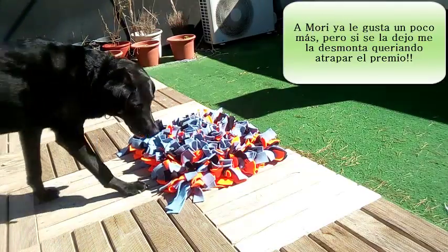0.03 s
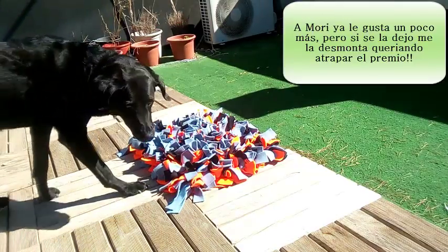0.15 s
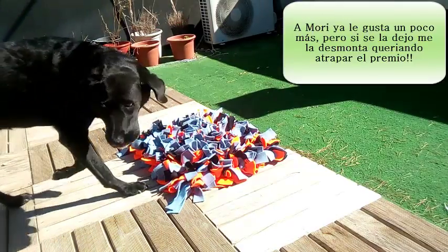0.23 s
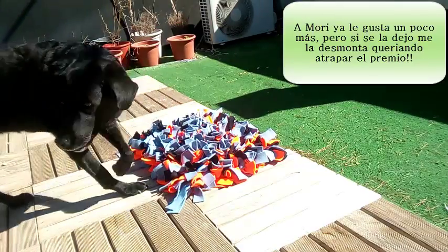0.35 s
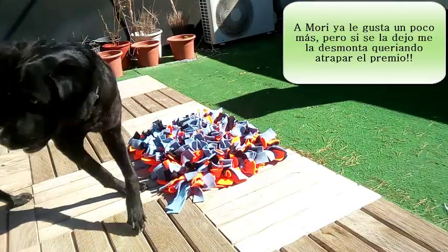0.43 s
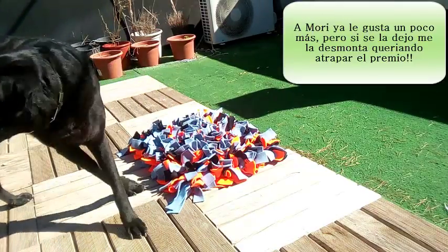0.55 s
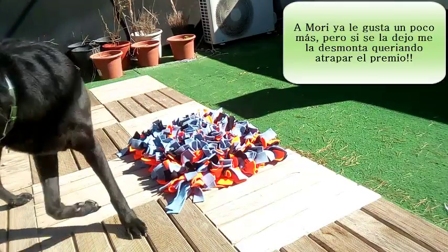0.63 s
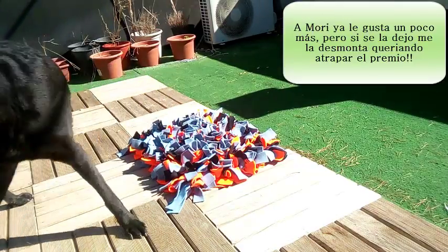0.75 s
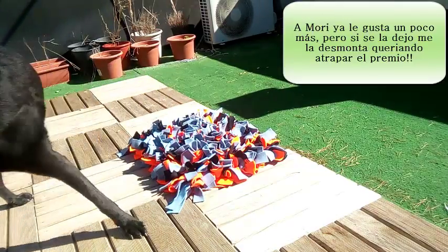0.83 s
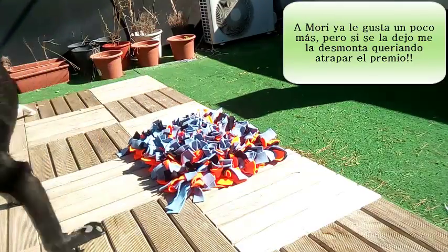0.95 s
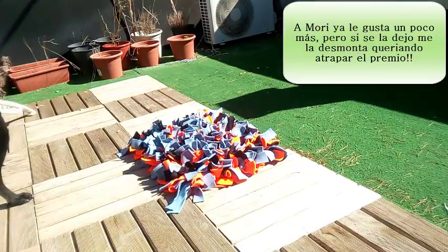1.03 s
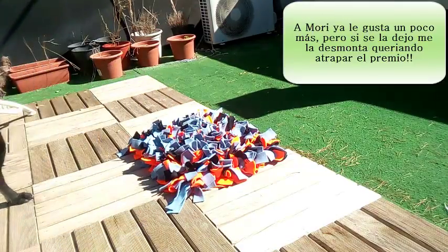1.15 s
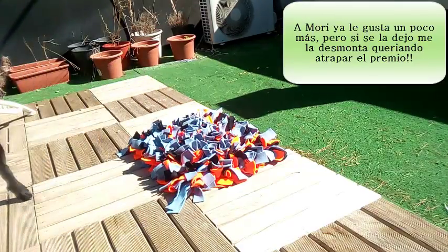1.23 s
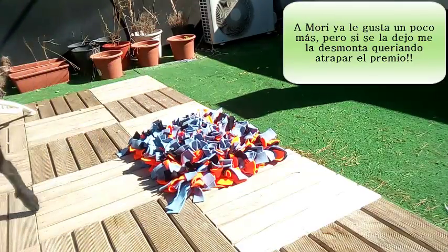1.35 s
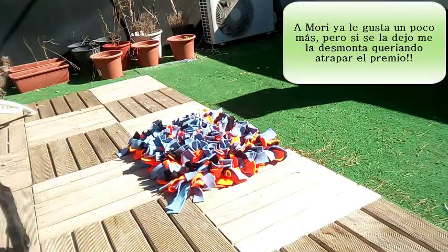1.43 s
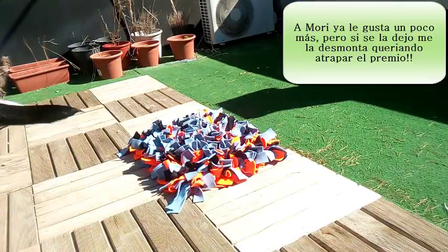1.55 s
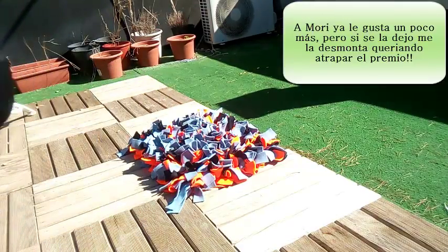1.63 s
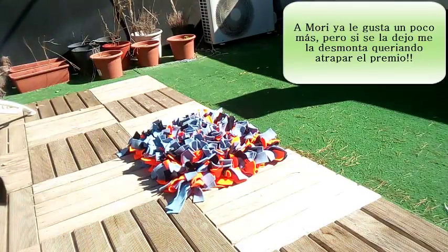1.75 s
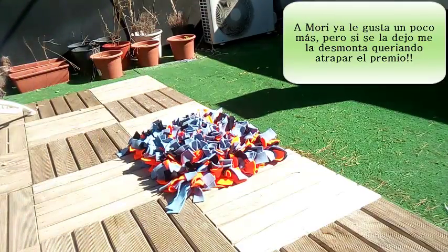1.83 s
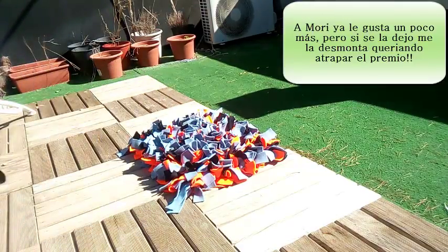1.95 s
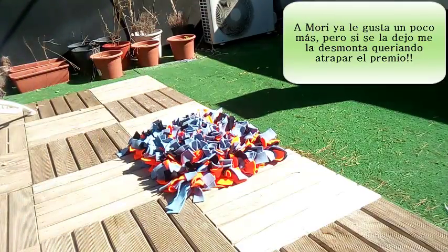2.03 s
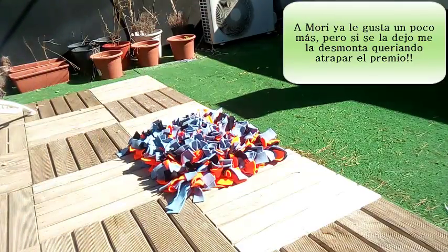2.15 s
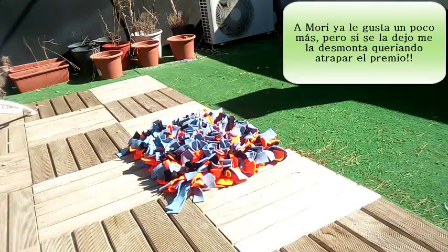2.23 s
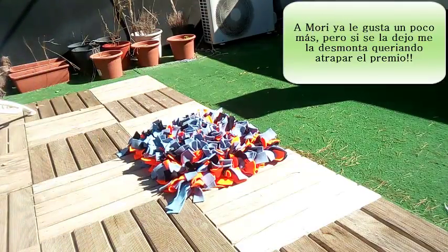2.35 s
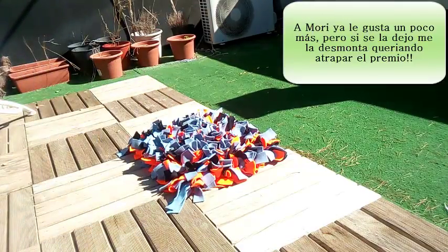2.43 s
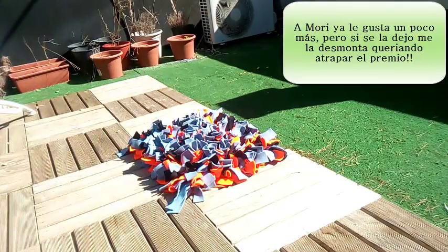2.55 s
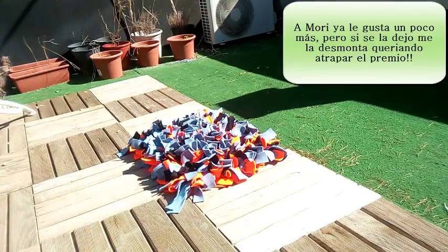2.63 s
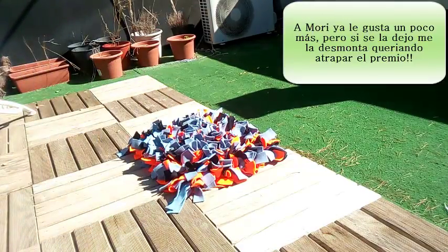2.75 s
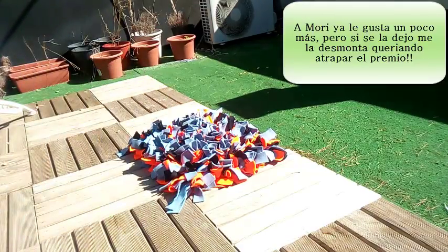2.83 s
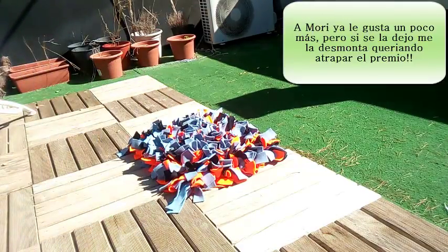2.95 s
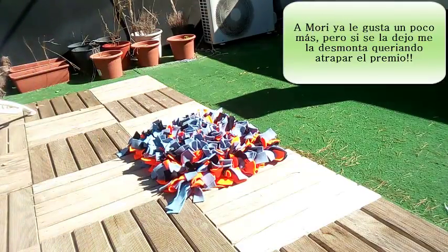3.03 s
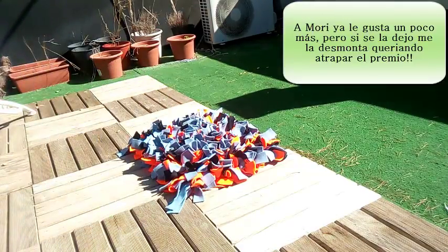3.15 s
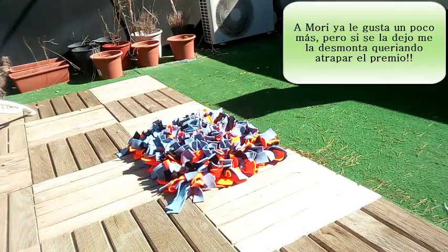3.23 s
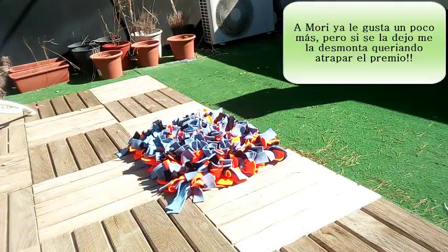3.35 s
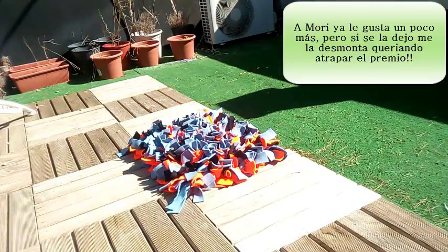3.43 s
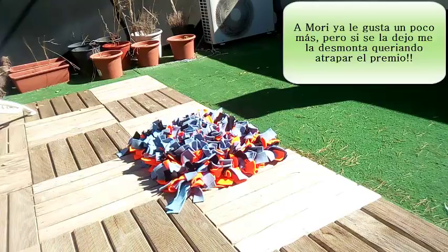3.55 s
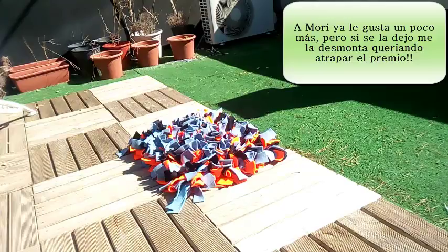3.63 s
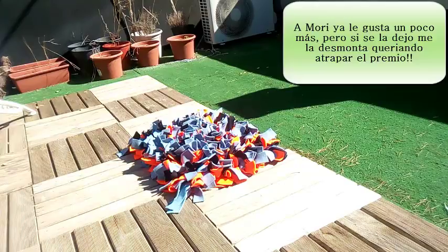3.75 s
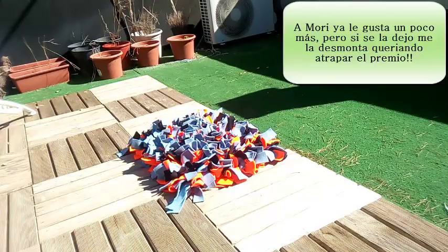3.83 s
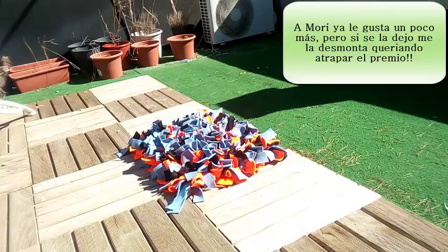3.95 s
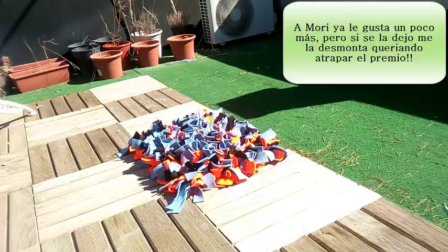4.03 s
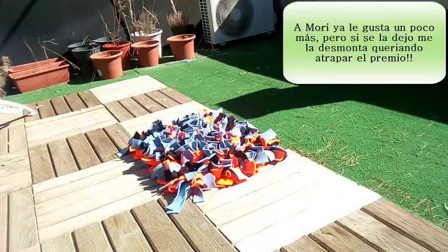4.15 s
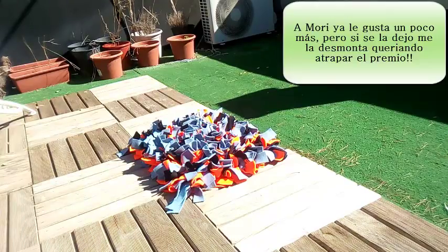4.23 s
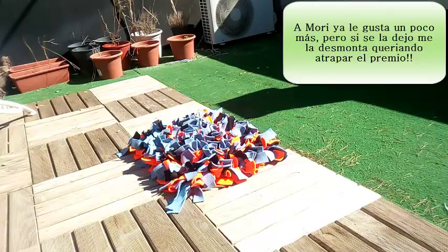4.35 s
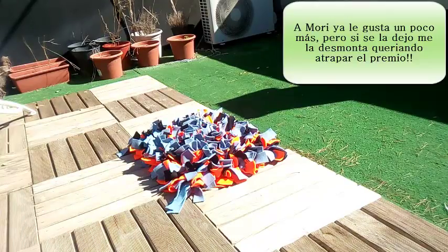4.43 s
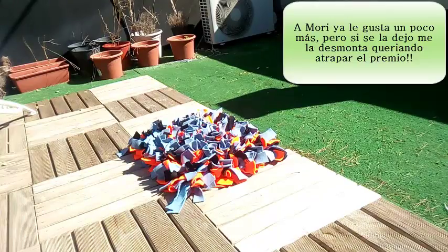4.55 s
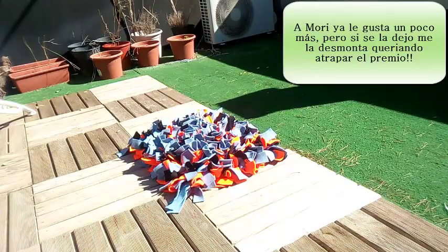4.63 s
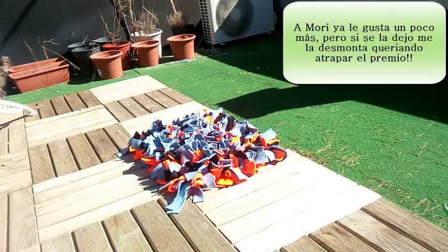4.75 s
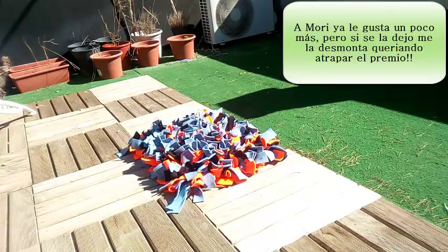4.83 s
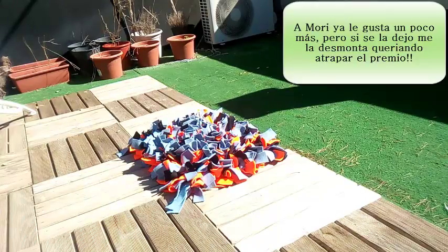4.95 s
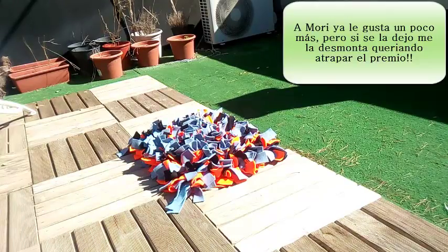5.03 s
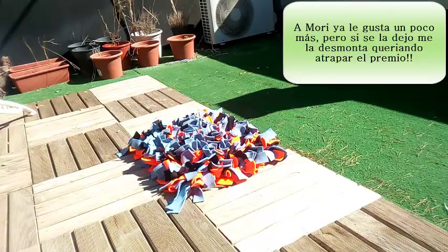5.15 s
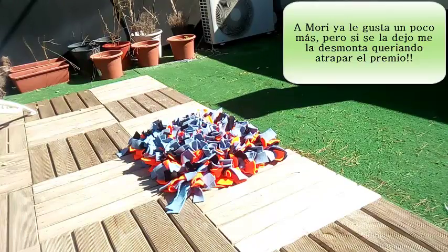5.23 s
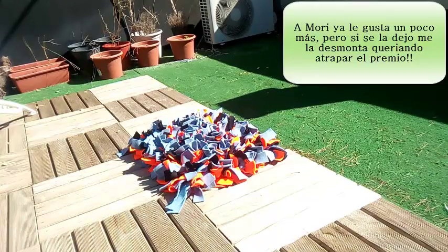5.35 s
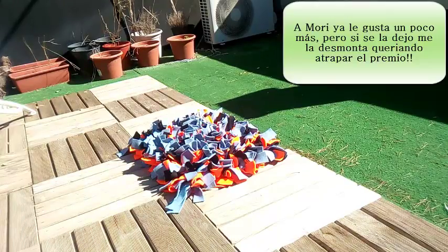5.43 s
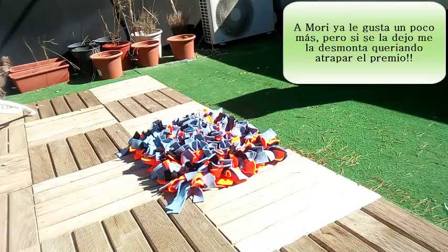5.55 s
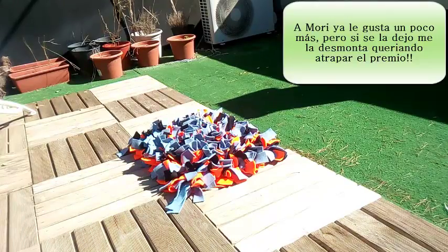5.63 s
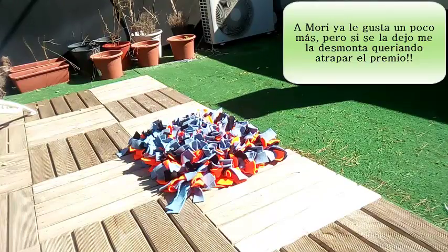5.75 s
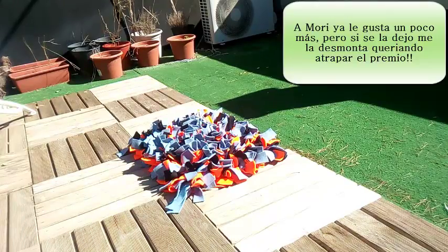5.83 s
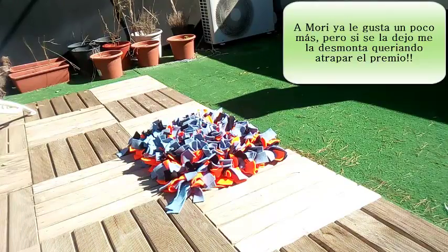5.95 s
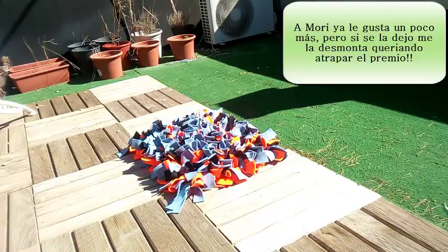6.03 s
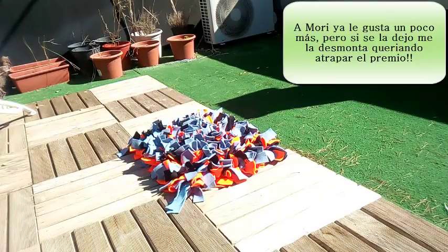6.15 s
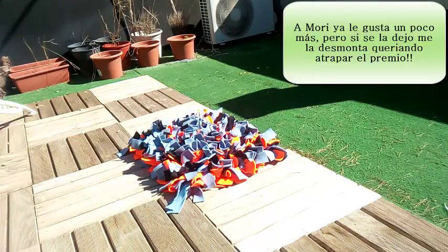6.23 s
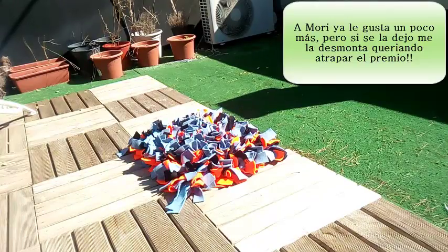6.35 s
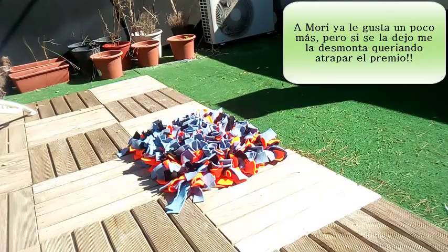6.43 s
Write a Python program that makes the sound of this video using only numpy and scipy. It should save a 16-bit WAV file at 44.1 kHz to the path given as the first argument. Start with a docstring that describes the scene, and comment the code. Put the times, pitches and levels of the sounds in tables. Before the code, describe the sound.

A dog's claws snap and tap irregularly on wooden decking, with gritty crunches, soft scuffs and low thuds over a faint outdoor hush.

```python
"""Dog on a walled terrace

A dog moves about a small walled terrace with wooden deck tiles: its claws tap and it crunches a hard treat.
Each tap or bite is a snap with grit around it, filtered by what was hit; near walls and the yard answer.
Paws scuff and squeak softly in between: uneven noise through a slowly rising resonance.
Low thuds, sines of sagging pitch, and gusts of rumbling noise reach the microphone over a faint outdoor hush."""
import sys
import numpy as np
from scipy import signal
from scipy.fft import rfft, irfft, next_fast_len
from scipy.io import wavfile
from scipy.ndimage import map_coordinates

SR = 44100
rng = np.random.default_rng(int(sys.argv[2]) if len(sys.argv) > 2 else 0)


def dump(signal):
    """Clip the signal to [-1, 1] and save it as 16-bit WAV at the path in sys.argv[1]."""
    limited = np.clip(np.atleast_2d(signal).T, -1, 1)
    pcm = np.round(limited * 32767).astype(np.int16)
    wavfile.write(sys.argv[1], SR, pcm)


N = 286209
TOP_HZ = 11050  # upper band limit

# shared spectrum of the taps and bites, also of the grit in scuffs: frequency_hz, relative_level_db
CONTACT_COLOUR = [(60, -23), (300, -17), (700, -10.5), (1400, -1.5), (2800, -1.5), (4800, -7.5),
                  (6000, -8.5), (7200, -18.5), (11000, -27)]


def amp(db):
    """Amplitude factor of a level in dB."""
    return 10 ** (np.asarray(db) / 20)


def unit(x):
    """x scaled to rms 1."""
    return x / np.sqrt(np.mean(x ** 2) + 1e-20)


def along(points, hz):
    """(Hz, value) points joined by straight lines on a log frequency axis."""
    point_hz, values = np.transpose(points)
    return np.interp(np.log(hz + 1), np.log(point_hz), values)


def curve(rows):
    """(s, value) rows as one value per sample."""
    return np.interp(np.arange(N) / SR, *np.transpose(rows))


def add(track, s, sound):
    """Mix a sound into a track from time s on, cutting what falls outside."""
    start = round(s * SR)
    sound = sound[max(-start, 0):]
    part = track[max(start, 0):][:len(sound)]
    part += sound[:len(part)]


def wobble(rate, size):
    """A smooth random curve, rate knots a second."""
    knots = rng.standard_normal(int(size * rate / SR) + 4)
    return map_coordinates(knots, [np.arange(size) * rate / SR])


def filtered(x, gain):
    """x times a gain that depends on frequency."""
    size = next_fast_len(len(x) + 8192)
    spectrum = rfft(x, size) * gain(np.fft.rfftfreq(size, 1 / SR))
    return irfft(spectrum, size)[:len(x)]


def noise(colour):
    """Noise of rms 1 with the given spectrum."""
    return unit(filtered(rng.standard_normal(N), lambda hz: amp(along(colour, hz))))


def causal(db):
    """The impulse response that starts at once and has these levels on the FFT grid."""
    cepstrum = irfft(db * np.log(10) / 20)
    half = len(cepstrum) // 2
    # folding the cepstrum onto positive time gives minimum phase
    cepstrum[1:half] *= 2
    cepstrum[half + 1:] = 0
    return irfft(np.exp(rfft(cepstrum)))


def gust_strength():
    """Each gust rises, holds and falls away exponentially; the strongest flow of the moment counts."""
    # gusts on the microphone: start_s, hold_length_s, level_db
    gusts = [(0.36, 0.12, -45), (4.42, 0.14, -42), (4.715, 0.13, -48), (4.859, .25, -45),
             (5.109, 0.098, -52.5), (5.815, 0.12, -48), (5.911, 0.048, -40.5)]
    attack_s, release_s, draught_db = 0.012, 0.015, -73.5  # a faint draught flows between gusts
    t = np.arange(N) / SR
    strength = np.full(N, amp(draught_db))
    for s, length, db in gusts:
        before = np.maximum(s - t, 0) / attack_s
        after = np.maximum(t - s - length, 0) / release_s
        strength = np.maximum(strength, amp(db) * np.exp(-before - after))
    return strength


def air(flutter_db):
    """The faint hush of the terrace, and gusts that rumble on the microphone, both as coloured noise."""
    # spectrum of the outdoor background: frequency_hz, relative_level_db
    hush_colour = [(25, -19.5), (50, -11.5), (85, 1), (250, -3), (500, -4.5), (1000, -10), (2200, -9.5),
                   (3200, -15), (5000, -17.5), (8000, -23.5), (11000, -25.5)]
    # course of the background before flutter: time_s, level_db
    hush_course = [(0, -62.5), (1.5, -63.5), (2.5, -64.5), (3.4, -62), (5.1, -62.5), (5.55, -69.5),
                   (6.0, -62.5), (6.49, -65)]
    # spectrum of air flow at the microphone: frequency_hz, relative_level_db
    rumble_colour = [(20, 2.5), (50, -1.5), (80, 7.5), (140, -2.5), (200, -13.5), (400, -33), (1000, -53),
                     (3000, -110)]
    hush_level = amp(curve(hush_course) + flutter_db * wobble(7.5, N))
    hush = hush_level * noise(hush_colour)
    return hush + gust_strength() * noise(rumble_colour)


def yard(wet_db, build_s, fade_s=0.72, size=16384):
    """Response of the place: direct path, near walls, and a diffuse wash that dies away in about a quarter second."""
    # decay of the wash: frequency_hz, t60_s
    decay = [(150, 1), (450, 0.24), (900, .32), (2000, 0.22), (5500, .25), (10000, 0.21)]
    # near wall echoes against the direct path: nominal_delay_s, level_db
    walls = [(.0092, -24), (0.0161, -5.5), (0.031, -19)]
    hz, t, z = signal.stft(rng.standard_normal(size), SR, nperseg=256)
    fading = z * amp(-60 * t / along(decay, hz)[:, None])
    wash = signal.istft(fading, SR, nperseg=256)[1][:size]
    age = np.arange(size) / SR
    wash *= (1 - np.exp(-(age / build_s) ** 2)) * np.exp(-(age / fade_s) ** 3)
    response = amp(wet_db) * wash / np.linalg.norm(wash)
    response[0] += 1  # direct path
    for delay, db in walls:
        varied_delay = delay * (1 + .02 * rng.standard_normal())
        response[round(varied_delay * SR)] += amp(db)
    return response


def scuffs(rough_db, grit_db, wet_db, overtone_db, glide):
    """Uneven friction swells and fades in one slowly rising resonance, with an overtone and broad grit."""
    # soft paw scuffs: middle_s, length_s, level_db, centre_hz, width_hz
    rubs = [(0.0, 0.038, -53, 1340, 1130), (0.149, 0.041, -53, 320, 122), (0.207, 0.041, -56, 1330, 140),
            (0.549, 0.056, -55, 2400, 513), (0.601, 0.037, -33, 790, 132), (0.729, 0.086, -45.5, 803, 168),
            (0.798, 0.15, -46.5, 1420, 240), (0.983, 0.044, -42, 770, 283), (1.336, 0.019, -54, 970, 604),
            (1.882, 0.01, -38, 2106, 176), (1.644, 0.063, -52.5, 4000, 4170),
            (1.658, 0.081, -54.5, 1490, 600), (2.152, 0.023, -46.5, 700, 194.7),
            (3.425, 0.02, -56, 2400, 700), (3.899, 0.023, -43.5, 960, 79), (4.23, 0.075, -56.5, 1320, 500),
            (4.508, 0.014, -40, 2500, 597), (4.967, 0.2, -58.5, 1510, 500), (5.086, 0.038, -51, 4570, 3390),
            (6.171, 0.068, -50, 1590, 895), (6.277, 0.092, -59, 3250, 496)]
    # a run of thin squeaks: middle_s, length_s, level_db
    squeaks = [(3.968, 0.4, -59.5), (4.325, 0.055, -50.5), (4.461, 0.078, -47.5), (4.616, 0.061, -58),
               (4.766, 0.041, -56.5)]
    squeak_hz, squeak_width_hz = 4550, 500  # the resonance they share
    track, t = np.zeros(N), np.arange(SR // 2) / SR
    middle = t[-1] / 2
    warped_t = t + glide / 2 * (t - middle) ** 2  # playback speeds up by the share glide per second
    for s, length, db, centre_hz, width_hz in rubs + [(*row, squeak_hz, squeak_width_hz) for row in squeaks]:
        def peak(hz):
            return 1 / (1 + (2 * (hz - centre_hz) / width_hz) ** 2)

        def resonance(hz):
            overtone = amp(overtone_db) * peak(hz / 1.88)
            return peak(hz) + overtone + amp(grit_db + along(CONTACT_COLOUR, hz))

        swell = np.exp(-2 * ((t - middle) / length) ** 2)
        friction = swell * rng.standard_normal(len(t)) * amp(rough_db * wobble(120, len(t)))
        rising = map_coordinates(filtered(friction, resonance), [SR * warped_t])
        rub = signal.fftconvolve(rising, yard(wet_db, build_s=0.0057))
        rub *= np.linalg.norm(swell) / np.linalg.norm(rub)  # same energy as noise of rms 1 under the swell
        add(track, s - middle, amp(db) * rub)
    return track


def crack_train():
    """Every crack as one row; a lesser crack borrows the colour of the nearest tap or bite."""
    # taps and bites, each at its main crack:
    # time_s, level_db, body_db, edge_db, ring_hz, ring_db, hollow_db, yard_db
    main_cracks = [(0.2613, -12, 3.5, -2.5, 2190, 3, 10.5, -6.5),
                   (0.5831, -23, -5.5, -3.5, 1170, 5.5, 2, -3.5), (0.909, -21, 10.5, 3.5, 3780, 6, 7, -6.5),
                   (1.1161, -35.5, -7.5, 2, 1750, -0.5, 10, 2), (1.405, -44, 5, 4, 2414, 15.5, -23, -3.5),
                   (1.881, -51.5, 22.5, -0.5, 2080, 9, -31, 0.5), (2.041, -50.5, 6.5, -10, 1550, 4.5, 9, 1),
                   (2.1431, -44.5, 17, -13, 682, 12, -12, -4), (2.2343, -47, -8, 9.5, 2090, 4, -2, -5),
                   (2.649, -43.5, -2, 0.5, 1753, 15, 25.5, 1), (2.794, -53.5, 9, 8.5, 3500, 6, -6, -14),
                   (2.9975, -20.5, -6, -1.5, 1630, 4.5, 13, -5.5),
                   (3.296, -31, -14.5, 9.5, 5730, 2.5, 14, -8.5),
                   (3.5826, -25, -8, 7, 2630, 4.5, -2.5, -4.5), (3.6742, -28, 3.5, 9.5, 2030, 12, -47, -7),
                   (3.867, -34, -7, 13.5, 2340, 14.5, 15, -3.5),
                   (4.0893, -24, 0.5, 1.5, 1657, 9, 11.5, -3.5),
                   (4.494, -33, -8.5, -2.5, 1754, 17.5, 0, -7), (5.06, -34.5, 2, -3, 1740, 25, -4, -1.5),
                   (6.1164, -34.5, 1.5, 2, 2240, 9.5, 2, 3.5)]
    # lesser cracks: time_s, level_db, extra_edge_db
    lesser_cracks = [(0.6709, -36.5, 1), (0.683, -44, 0), (0.8994, -29, -6), (0.9413, -34, -13),
                     (1.185, -46, -2), (1.243, -43.5, -2.5), (1.393, -50, -3), (1.862, -53, -10),
                     (2.427, -57, -13.5), (2.988, -33.5, 19.5), (3.0237, -31, 8), (3.0843, -33, 7),
                     (3.2675, -47, -10.5), (3.611, -25.5, -6.5), (3.6261, -26.5, -5.5), (3.6593, -26, -6.5),
                     (3.724, -31, -4), (3.751, -40, -3), (3.794, -45.5, -2), (4.035, -34, 0.5),
                     (4.0487, -28, 4), (4.1008, -27.5, 12), (4.1422, -34, 8), (4.159, -29, 0),
                     (4.277, -47, 4), (4.89, -51, 7), (5.0047, -47, 1.5), (6.2131, -46, 1),
                     (6.272, -49.5, 1)]
    ring_share, hollow_share = 1, 0.25  # shares of the main crack's ring dB and cavity dB
    extra_yard_db = 2  # lesser cracks are heard a little more by way of the yard
    train = list(main_cracks)
    for s, db, extra_edge_db in lesser_cracks:
        nearest = min(main_cracks, key=lambda crack: abs(crack[0] - s))
        _, _, body_db, edge_db, ring_hz, ring_db, hollow_db, wet_db = nearest
        train.append((s, db, body_db, edge_db + extra_edge_db, ring_hz,
                      ring_share * ring_db, hollow_share * hollow_db, wet_db + extra_yard_db))
    return train


def firmness(db):
    """Snap dB and crumble time of a contact of this level: the louder it is, the sooner it stops crumbling."""
    # snap and after-cracks by loudness: contact_level_db, snap_db, crumble_s
    contacts = [(-48.5, -1, 0.0086), (-34, -11.5, 0.0055), (-24.5, -1.5, 0.0032), (-11, -1, 0.0027)]
    levels, *columns = np.transpose(contacts)
    return [np.interp(db, levels, column) for column in columns]


def bell(hz, centre_hz, width):
    """A resonance peak of height 1; width is a share of its centre."""
    return 1 / (1 + (np.log((hz + 1) / centre_hz) / width) ** 2)


def snap(snap_db, lead_s, lead_db, crumble_db, crumble_s, size=2048):
    """Force of one contact: a softened onset leads into the snap in the middle, tiny after-cracks follow."""
    t = (np.arange(size) - size // 2) / SR
    grit = rng.standard_normal(size) ** 3  # cubing makes it sparse and spiky
    lead = grit * (t < 0) * np.exp(-np.abs(t) / lead_s)
    crumble = grit * (t > 0) * np.exp(-np.abs(t) / crumble_s)
    force = amp(snap_db) * (t == 0)
    force = force + amp(lead_db) * lead / np.linalg.norm(lead)
    return force + amp(crumble_db) * crumble / np.linalg.norm(crumble)


def clicks(ring_width, hollow_width, lift_hz, ripple_db, spacing_hz, size=2048):
    """Each snap sounds through what was hit; the dog keeps moving, so each finds its own paths round the yard."""
    # where body acts in the spectrum: frequency_hz, share_of_body_db
    body_shape = [(300, .55), (650, 1), (1000, 1), (1800, 0)]
    # where edge acts in the spectrum: frequency_hz, share_of_edge_db
    edge_shape = [(2500, 0), (5000, 1)]
    hollow_hz = 495  # lowest pitch of the cavity note
    track, hz = np.zeros(N), np.fft.rfftfreq(size, 1 / SR)
    for s, db, body_db, edge_db, ring_hz, ring_db, hollow_db, wet_db in crack_train():
        colour = along(CONTACT_COLOUR, hz)
        colour += body_db * along(body_shape, hz) + edge_db * along(edge_shape, hz)
        cavity_hz = hollow_hz + lift_hz * max(body_db, 0)  # a more open cavity sounds fuller and higher
        colour += ring_db * bell(hz, ring_hz, ring_width)
        colour += hollow_db * bell(hz, cavity_hz, hollow_width)
        # a ladder of weaker modes above the ring
        colour += ripple_db * np.cos(2 * np.pi * (hz - ring_hz) / spacing_hz) * (hz > ring_hz)
        colour -= 40 * (hz > TOP_HZ)
        snap_db, crumble_s = firmness(db)
        force = snap(snap_db, lead_s=0.0021, lead_db=-7.5, crumble_db=3.5, crumble_s=crumble_s)
        click = signal.fftconvolve(force, causal(colour))
        # the level counts the direct sound's whole energy as rms over 10 ms
        click *= amp(db) * np.sqrt(SR / 100) / np.linalg.norm(click)
        add(track, s - len(force) / 2 / SR, signal.fftconvolve(click, yard(wet_db, build_s=0.005)))
    return track


def thuds(rise_s, sag, overtone_db):
    """Soft low pushes whose wavering pitch sags as they die; sag is a share of the nominal pitch."""
    # low thuds: start_s, peak_db, nominal_pitch_hz
    pushes = [(0.33, -28.5, 515), (0.353, -24, 248), (0.356, -27, 141), (0.414, -33.5, 152),
              (4.415, -26.5, 119), (4.463, -30, 89), (4.854, -41.5, 143), (4.881, -29, 102.6),
              (5.021, -33.5, 78), (5.818, -31.5, 138), (5.929, -32.5, 127)]
    cycles = 13.6  # a thud decays by 60 dB within this many cycles of its nominal pitch
    track, t = np.zeros(N), np.arange(SR // 3) / SR
    for s, db, hz in pushes:
        t60 = cycles / hz
        falling = sag * (np.exp(-t / 0.0073) - .5)
        pitch_hz = hz * (1 + falling + 0.23 * wobble(48.5, len(t)))
        phase = 2 * np.pi * np.cumsum(pitch_hz) / SR
        tone = np.sin(phase) + amp(overtone_db) * np.sin(1.64 * phase)
        push = tone * (1 - np.exp(-t / rise_s)) * amp(-60 * t / t60)
        add(track, s, amp(db) * push / np.abs(push).max())
    return track


def scene():
    """The dog's taps, bites, scuffs and squeaks, with thuds and moving air, at one microphone."""
    taps = clicks(ring_width=0.15, hollow_width=.11, lift_hz=27.41, ripple_db=2.0, spacing_hz=689)
    paws = scuffs(rough_db=5.0, grit_db=-30.0, wet_db=-10, overtone_db=-28.5, glide=0.58)
    low = thuds(rise_s=0.0062, sag=.25, overtone_db=-21.5)
    return (taps + paws + low + air(flutter_db=1.65))[None]


def record(dry):
    """Peaks beyond 0.9 of full scale are clipped, then a steep low-pass removes what lies above the band limit."""
    clipped = np.clip(dry[0], -.9, .9)
    return filtered(clipped, lambda hz: 1 / (1 + (hz / TOP_HZ) ** 120))[None]


dry = scene()
out = record(dry)
dump(out)
```